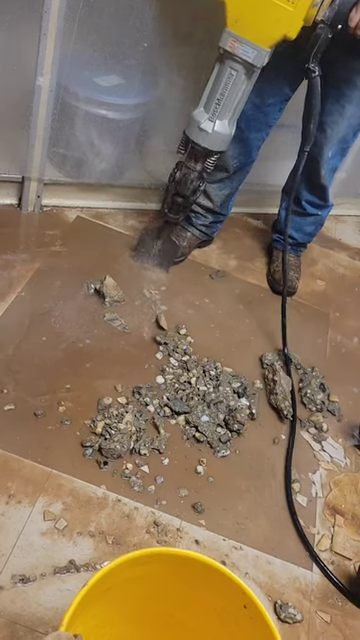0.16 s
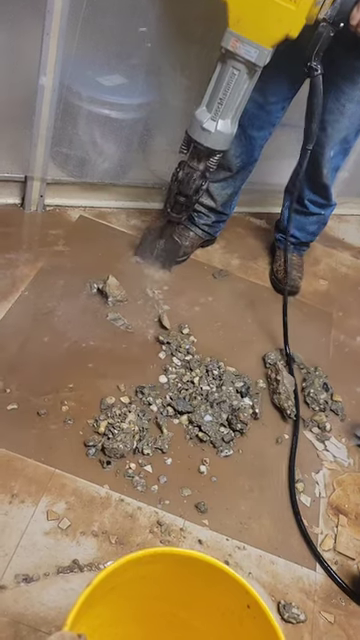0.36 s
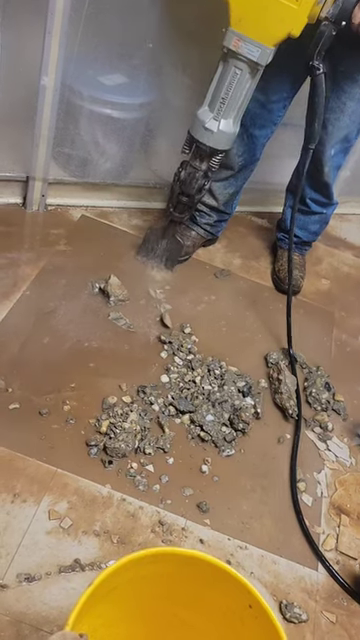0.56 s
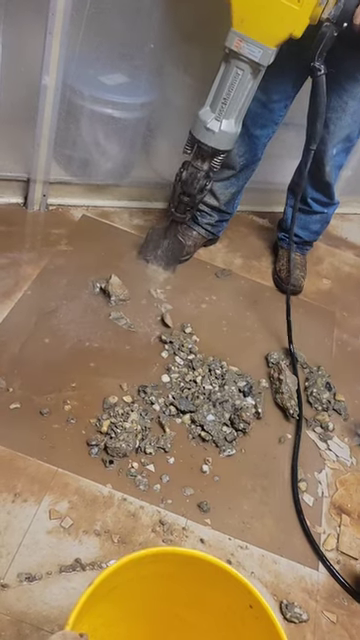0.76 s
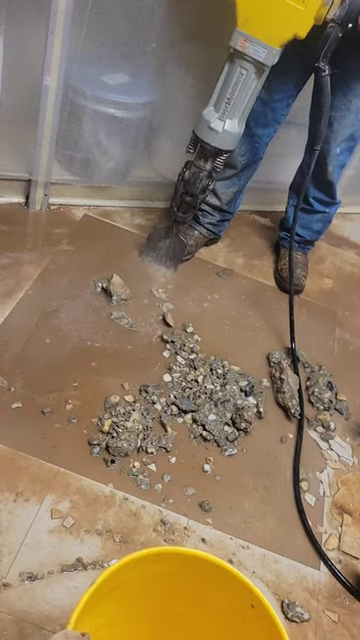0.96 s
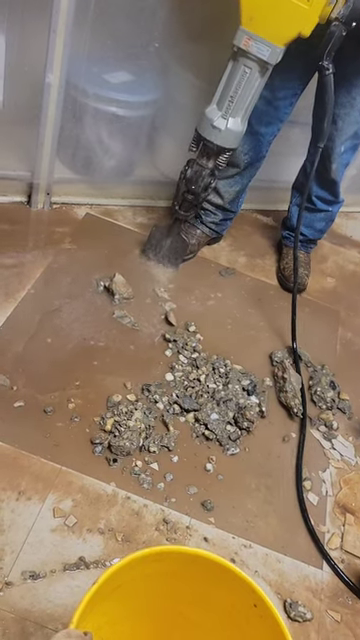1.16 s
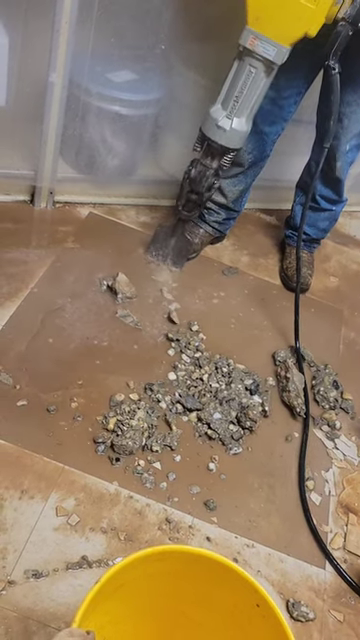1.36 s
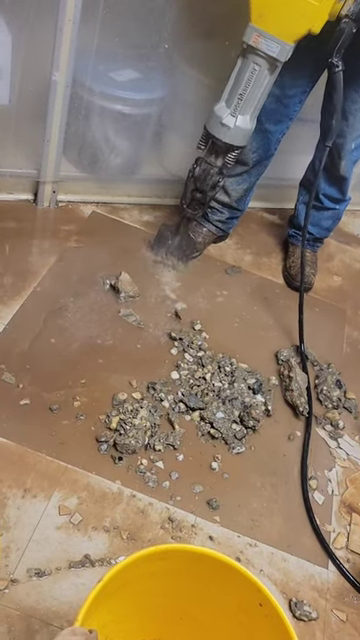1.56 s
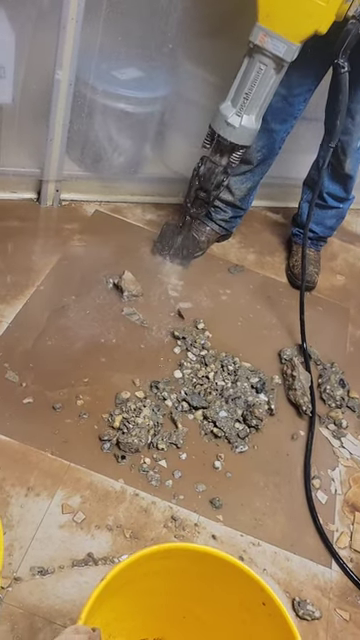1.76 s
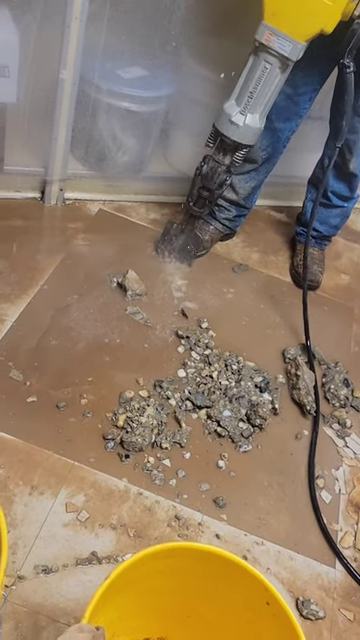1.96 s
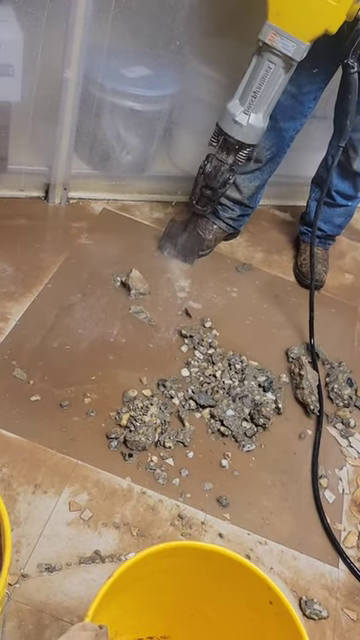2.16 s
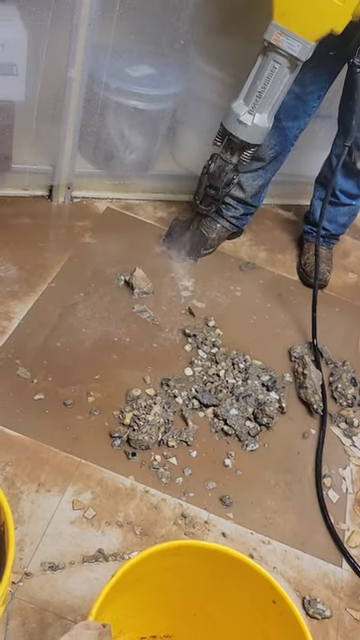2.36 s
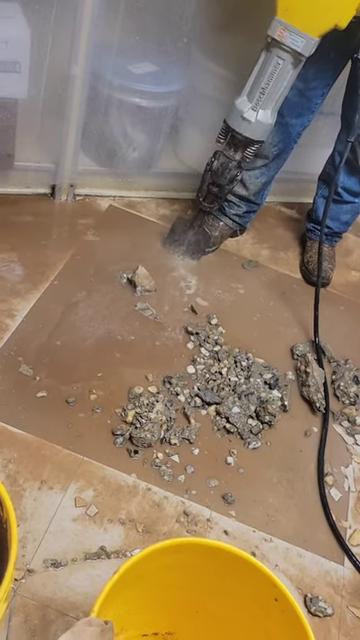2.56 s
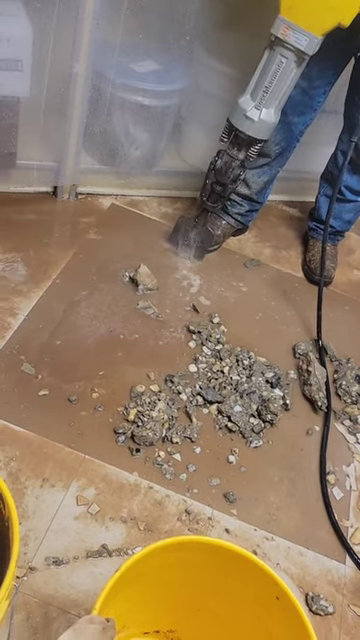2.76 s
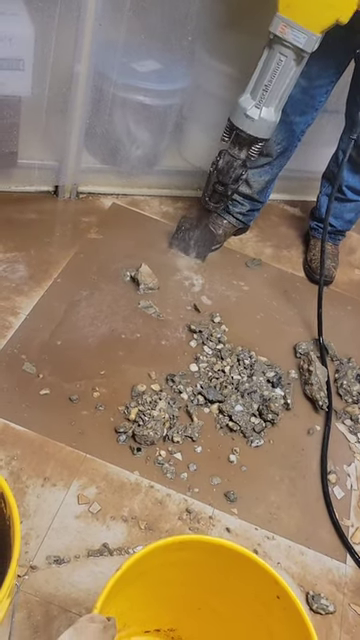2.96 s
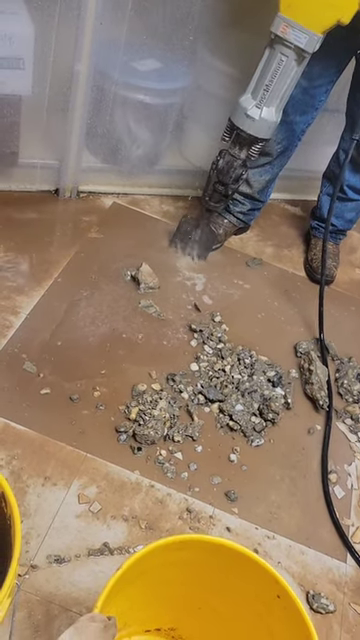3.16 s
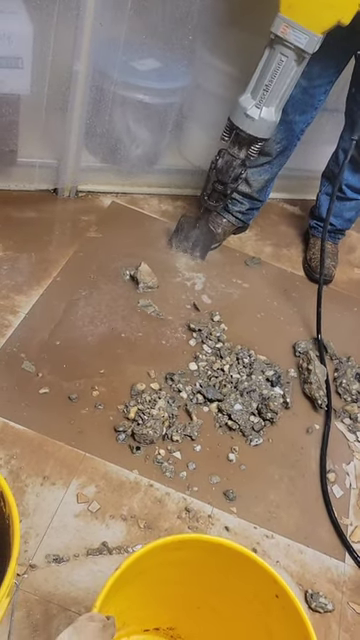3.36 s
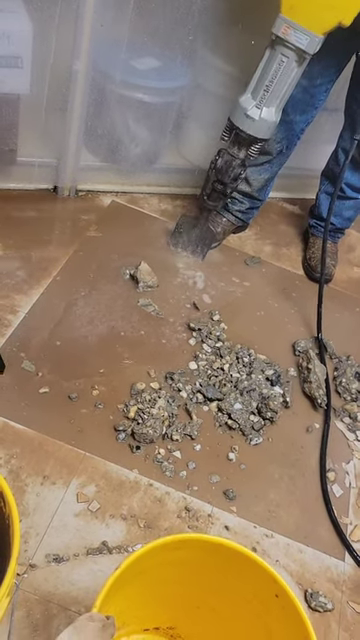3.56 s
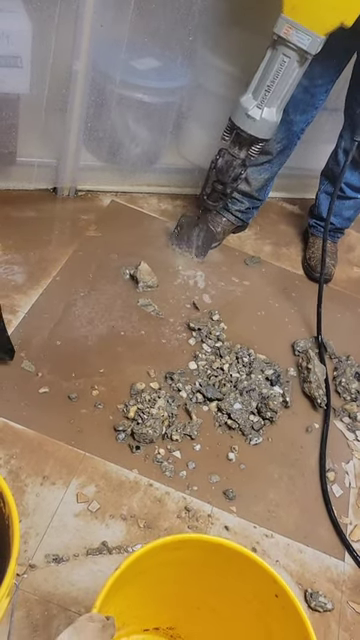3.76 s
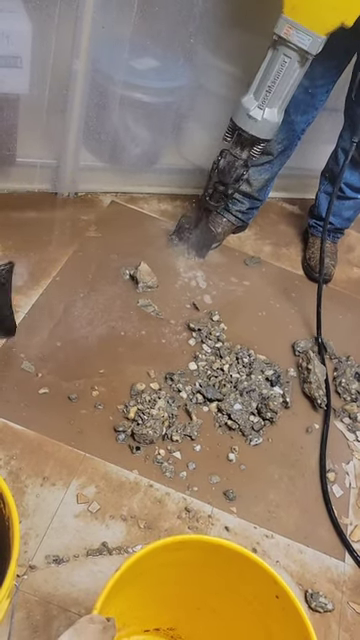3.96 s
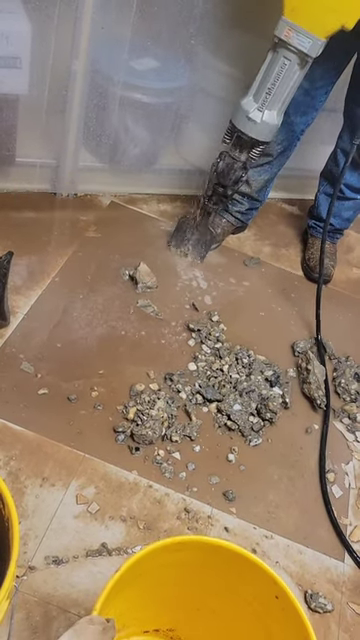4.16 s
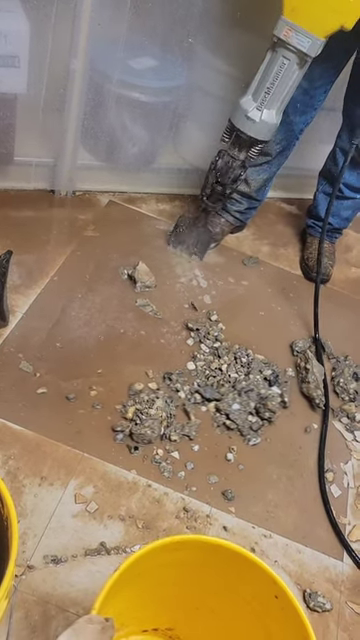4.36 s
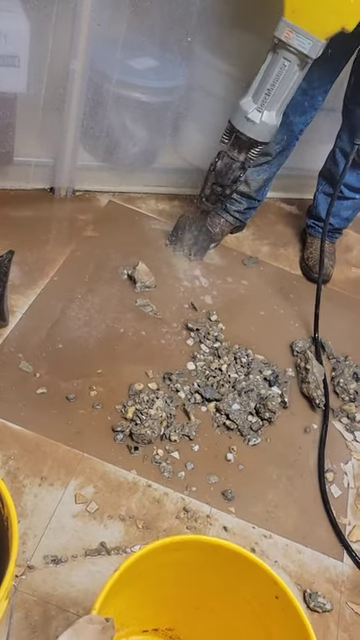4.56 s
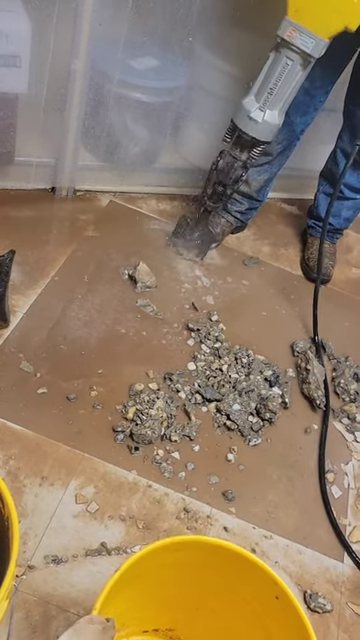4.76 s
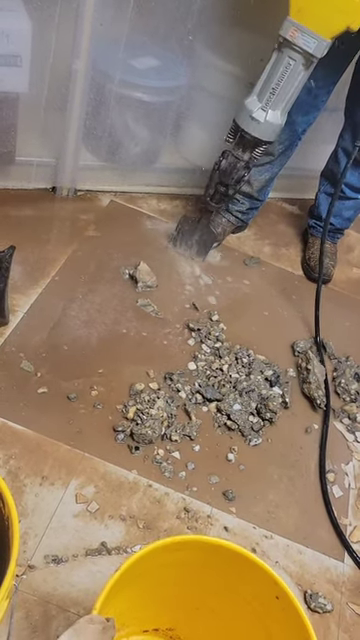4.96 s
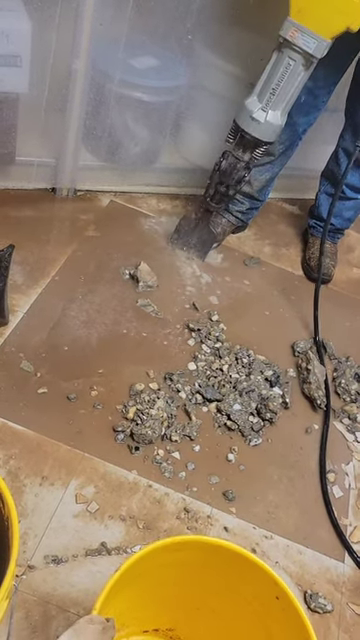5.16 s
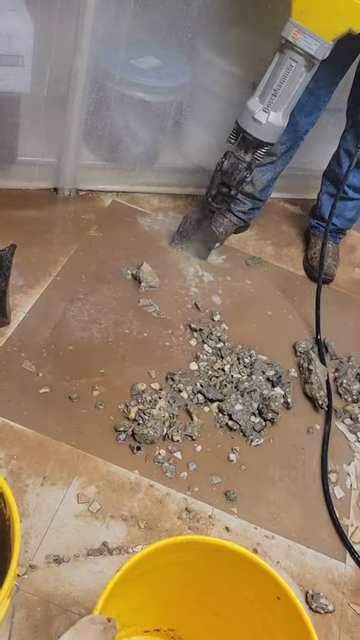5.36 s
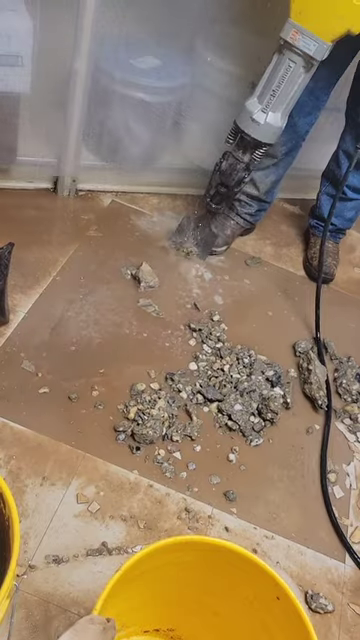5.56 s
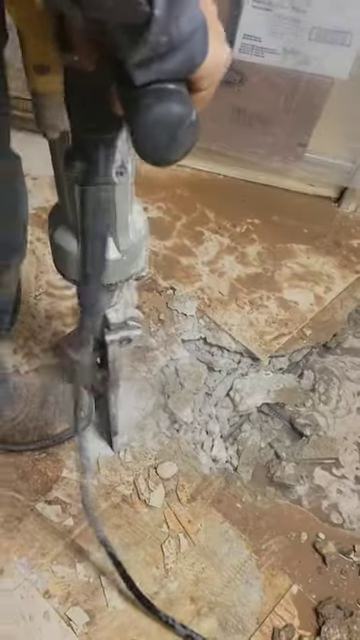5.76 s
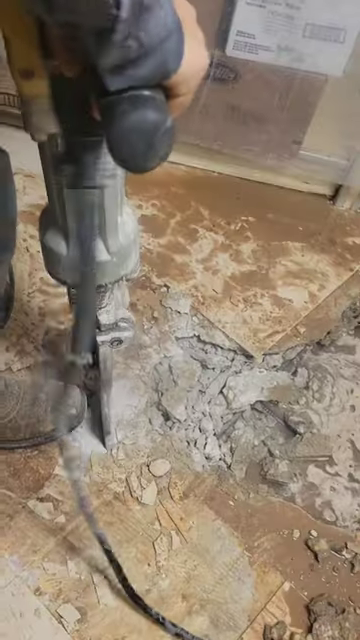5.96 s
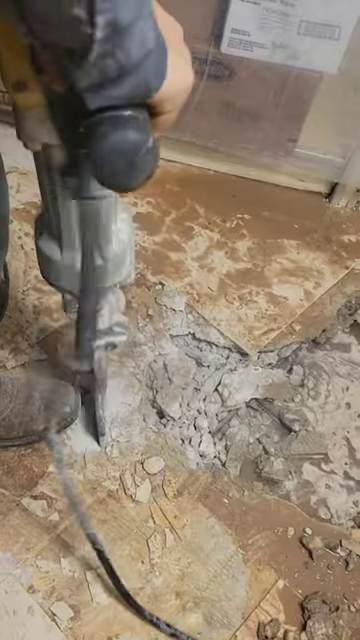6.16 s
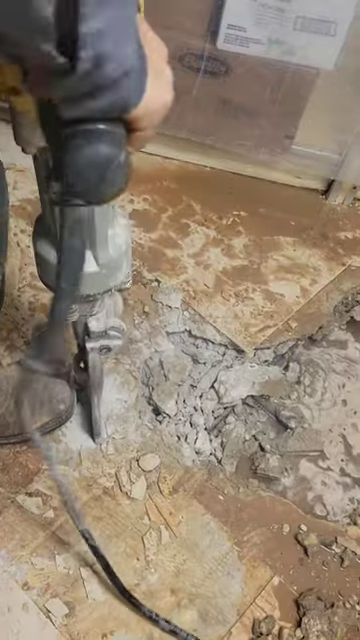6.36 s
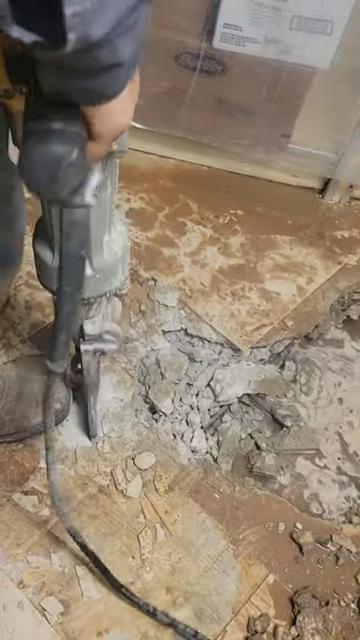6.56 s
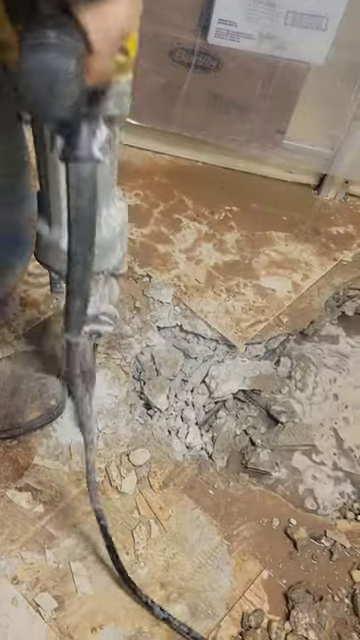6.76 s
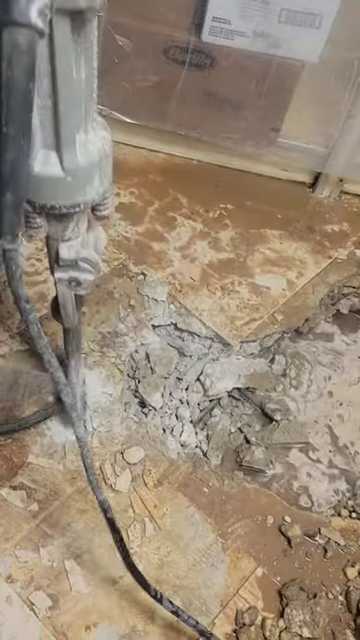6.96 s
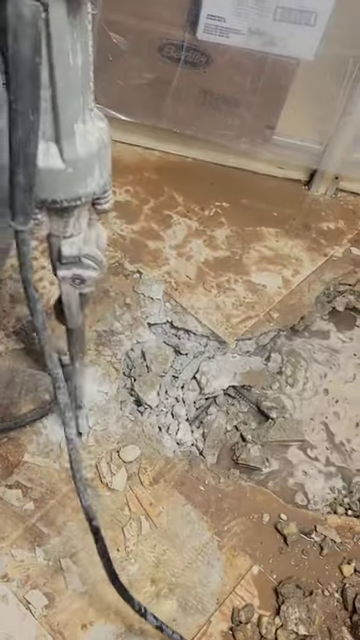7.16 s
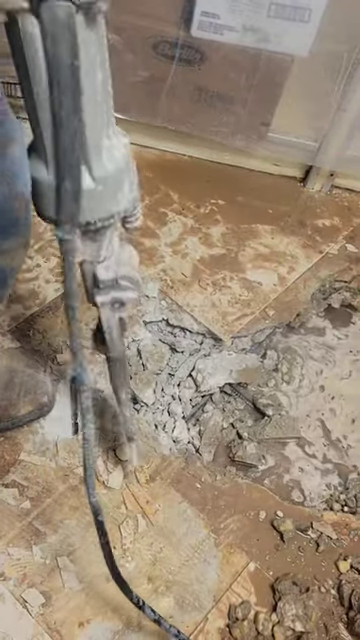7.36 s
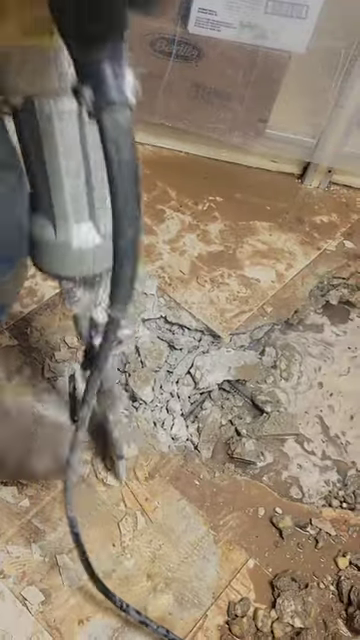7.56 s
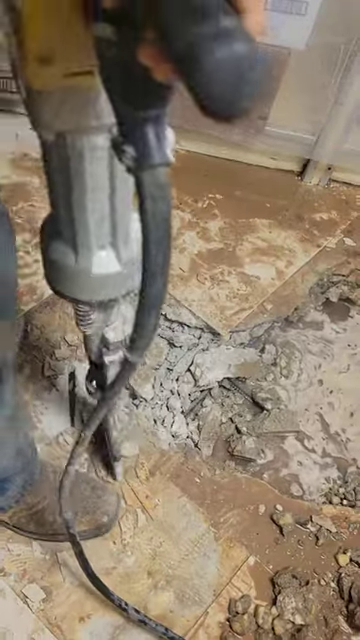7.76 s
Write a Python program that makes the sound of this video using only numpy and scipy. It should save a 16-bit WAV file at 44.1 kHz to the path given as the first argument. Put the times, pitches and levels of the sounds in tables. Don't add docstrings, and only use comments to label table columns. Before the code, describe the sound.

Rapid ringing jackhammer blows on a concrete floor, a short gap, a closer burst that runs down, then a knock and gritty drag.

```python
import sys
import numpy as np
from scipy import signal
from scipy.fft import rfft, irfft, next_fast_len
from scipy.io import wavfile
from scipy.ndimage import uniform_filter1d

SR = 44100
rng = np.random.default_rng(int(sys.argv[2]) if len(sys.argv) > 2 else 0)


def persist_wave(psi):
    counts = np.round(np.clip(psi, -1, 1) * 32767).astype(np.int16)
    wavfile.write(sys.argv[1], SR, np.atleast_2d(counts).T)


def linear_from_db(decibels):
    return 10 ** (np.asarray(decibels, float) / 20)


N = 345303
T = np.arange(N) / SR
CUT_S = 5.78

STEEL_HZ = [1500, 2150, 2370, 2870, 3140, 3690, 4150, 4725, 4822, 5495, 5700, 5970, 6500, 6990, 7170, 7975,
            9430, 10250, 10420, 11480, 11700, 11880, 12550, 13040, 14535, 15500]
# level in dB in each of the four stages, free t60 in s.
SHAFT = [(-12, -32, -12, -30, 0.39), (-14.5, -27, -38, -25, 0.12), (-28, -10, -19, -23, 0.1),
         (-9, -17, -13, -11, 0.31), (-7.5, -10, -5.5, -10, 0.33), (-18, -16, -20, -25, .2),
         (-11.5, -21, -29, -2, 0.4), (-9, -18, -10.5, -11, 0.92), (-5.5, -9, -23, -25, 1),
         (-7.5, 7.5, -7.5, -1, 0.62), (-13.5, -10, -24, -18, 0.64), (-5, -12, -15, -3, 0.38),
         (-27.5, 4, -7, -22, 0.07)]
# level in dB in each of the four stages, free t60 in s.
BARREL = [(-28, -17, -16, -18, 0.32), (-9.5, -14, -6, -1.5, 0.41), (-8.5, -5, 1, -17, 0.23),
          (-9.5, -10, -19, -7, 0.24), (-18, -25, -29, -25, 0.49), (-29, -27.5, -35, -7.5, 2.8),
          (-4.5, 1.5, -22, -11, 0.95), (-10.5, -10, -31, -7, 0.25), (-8, -6, -17, -14, 0.51),
          (-19, -1, -7, -18, 0.23), (-20.5, -21, -28, -15, 0.47), (0, 2, 0, 5, 0.24),
          (-26, -19, -26, -5, 4.0)]
# start in s, damping in dB per s, crushing held in ms,
# fall in dB in 10 ms, crack in dB.
STAGES = [
    (0, 72, 38.2, 5, 1),
    (5.78, 133, 19, 2.5, 7.5),
    (6.4, 118, 15.6, 9.5, 12),
    (6.9, 64, 48, 13, -2),
]


def rms_one(x):
    return x / np.sqrt(np.mean(x ** 2) + 1e-20)


def in_time(rows):
    s, *columns = np.transpose(rows)
    return [np.interp(T, s, c) for c in columns]


def drift(rate):
    r = np.exp(-2 * np.pi * rate / SR)
    return rms_one(signal.lfilter([1], [1, -2 * r, r * r], rng.standard_normal(N)))


def filtered(x, *curves):
    size = next_fast_len(N)
    log_hz = np.log(np.arange(size // 2 + 1) * SR / size + 1)
    gains = []
    for curve in curves:
        hz, db = np.transpose(curve)
        gains.append(linear_from_db(np.interp(log_hz, np.log(hz), db)))
    return irfft(rfft(x, size) * gains, size)[:, :N]


def noise(spectrum):
    # frequency in Hz, side minus mid in dB.
    width = [(60, -3), (110, -13.5), (200, -24), (380, 1), (700, 3.5), (1290, 4.5), (2380, -0.5), (4400, 1),
             (8120, 1.5), (15000, -0.5)]
    coloured = filtered(rng.standard_normal((2, N)), spectrum, spectrum)
    mid, side = filtered(coloured, [(1, 0)], width)
    return rms_one(np.array([mid + side, mid - side]))


def band_pass(x, low_hz, high_hz):
    return signal.sosfilt(signal.butter(2, [low_hz, high_hz], "band", fs=SR, output="sos"), x)


def band(x, low_hz, high_hz):
    return rms_one(band_pass(x, low_hz, min(high_hz, 20000)))


def ring(clicks, hz, t60):
    r, w = linear_from_db(-60 / (t60 * SR)), 2 * np.pi * hz / SR
    return signal.lfilter([0, np.sin(w)], [1, -2 * r * np.cos(w), r * r], clicks + 1e-18)


def train(seconds, sizes):
    clicks = np.zeros(np.shape(sizes)[:-1] + (N,))
    clicks[..., np.round(np.asarray(seconds) * SR).astype(int)] = sizes
    return clicks


def since_blow(s):
    last = np.clip(np.searchsorted(s, T) - 1, 0, None)
    return last, np.maximum(T - s[last], 0)


def after_blow(s, level_db, rise_ms, hold_ms, fall_db):
    last, age = since_blow(s)
    ms, hold = 1000 * age, hold_ms[last]
    fall = fall_db[last] * hold / 30 * np.logaddexp(0, 3 * (ms / hold - 1))
    room = linear_from_db(-16.5 - 80 * age)
    return linear_from_db(level_db[last]) * (linear_from_db(-fall) + room) * (1 - np.exp(-ms / rise_ms))


def far_blows():
    counted = [0, 1, 10, 20, 26, 35, 50, 67, 73, 77]
    lands_s = [0.2091, .2730, 0.9095, 1.6158, 2.0423, 2.675, 3.7376, 4.9447, 5.3672, 5.6532]
    # time in s, push in dB,
    # rebound in dB (every second blow bites, the one between skids).
    lean = [(.2, 4, 2.5), (.33, 2.5, 0.5), (.45, 2, -0.5), (.8, -0.5, .5), (1.2, 1, 0.5), (1.9, 0, 2),
            (2.2, -1, 0), (2.6, 0.5, 1.5), (3.1, 0.5, 0), (3.7, 0.5, 0), (4.3, 0, -1.5), (5.0, 0.5, .3),
            (5.5, 0, 1.8), (5.66, -2, -3)]
    level_db, scatter_db = [-18.5, -21, -20, -25], [1.2, 1.43, 1.96, 1.03]
    push_share, rebound_share = [0.88, 0.72, 1.1, 0.14], [1.36, 0.48, 0.78, 0.17]
    jitter_ms = 0.596
    k = np.arange(counted[-1] + 1)
    luck = rng.standard_normal((len(k), 5))
    s = np.interp(k, counted, lands_s) + jitter_ms / 1000 * luck[:, 0].clip(-2, 2)
    at, push, rebound = np.transpose(lean)
    push = np.interp(s, at, push)
    rebound = np.interp(s, at, rebound) * (-1) ** k
    leaning = np.outer(push, push_share) + np.outer(rebound, rebound_share)
    return np.c_[s, level_db + leaning + scatter_db * luck[:, 1:]]


def chisel(s, ring_db, top_db, stage):
    last, age = since_blow(s)
    damping = np.array(STAGES)[stage, 1]
    shake = np.array([drift(64) for k in range(4)]) * np.sqrt(damping[last] / 100)
    out = np.zeros((2, N))
    for k, (hz, (*levels_db, t60)) in enumerate(zip(STEEL_HZ, SHAFT + BARREL)):
        luck = rng.standard_normal((len(s), 6)).T
        seat = signal.lfilter([1], [1, -.6], luck[0])
        level_db = (top_db if hz > 6600 else ring_db) + np.array(levels_db)[stage] + 1.0
        level_db = level_db + np.sqrt(damping / 100) * (2.13 * seat + 2.25 * luck[1:3])
        pitch = hz + (5 + .0011 * hz) * luck[3]
        phase = 2 * np.pi * (pitch[last] * age + luck[4:, last]) + 0.83 * shake[k % 4]
        swell = 1 - np.exp(-age * (1500.0 if 4000 < hz < 6600 else 300.0))
        fall = 60 / t60 + damping[last] * (.45 if t60 > 2 else 1)
        out += linear_from_db(level_db[:, last] - fall * age + 3.8 * shake[k % 3 + 1]) * swell * np.sin(phase)
    return out


def crushing(s, ring_db, top_db, crush_db, thud_db, stage):
    # frequency in Hz, level in dB.
    far_colour = [(35, -41), (60, 4), (156, -16), (336, 9), (547, -12), (1500, -10), (2320, -16),
                  (3130, -16.5), (3700, -20.5), (4870, -14.5), (6300, -15.5), (8520, -28), (11000, -24),
                  (11700, -16.5), (15600, -20.5)]
    # frequency in Hz, level in dB.
    near_colour = [(35, -46), (60, -16), (226, -5), (476, -22), (690, -17), (2110, -20.5), (3600, -20.5),
                   (5110, -19.5), (5480, -9.5), (8520, -36.5), (10800, -32.5), (11500, -23), (15600, -31.5)]
    stone = np.where(T < CUT_S, noise(far_colour), noise(near_colour)) * linear_from_db(1.5 * drift(480))
    hold_ms, fall_db, crack_db = np.array(STAGES)[stage, 2:].T
    last, age = since_blow(s)
    out = band(stone, 50, 468) * after_blow(s, thud_db - 3, 1.8, 0.93 * hold_ms, 0.35 * fall_db)
    crunch = after_blow(s, crush_db - 4.0, 0.63, hold_ms, fall_db)
    bright = after_blow(s, ring_db - 1.5, 0.72, 0.69 * hold_ms, 0.73 * fall_db)
    spray = after_blow(s, top_db - 1.5, 4.0, hold_ms, 0.78 * fall_db)
    for low_hz, high_hz, envelope in [(533, 2640, crunch), (2650, 6950, bright), (7030, 16820, spray)]:
        edges = np.geomspace(low_hz, high_hz, 6)
        patches = 0
        for k, pair in enumerate(zip(edges, edges[1:])):
            luck = linear_from_db(1.53 * rng.standard_normal(len(s)))[last]
            patches = patches + (-1) ** k * luck * band_pass(stone, *pair)
        out = rms_one(patches) * envelope - out
    crack = band(stone, 750, 17000) * linear_from_db((ring_db + crack_db)[last] - 16000 * age)
    return out + crack


def thud(blows, booms, echoes, boom_db, knock_db, clutter_db):
    s, thud_db = np.transpose(blows)[[0, 4]]
    out = np.zeros((2, N))
    for hz, db, t60, ms in booms:
        out -= ring(train(s + ms / 1000, linear_from_db(thud_db + db + boom_db)), hz, t60)
    paths = 0
    for ms, left, right in echoes:
        level_db = thud_db + np.array([[left], [right]]) + 1.4 * rng.standard_normal(len(s))
        paths = paths + train(s + ms / 1000, linear_from_db(level_db))
    knock = signal.lfilter([.2], [1, -.8], ring(paths, 522, 0.0036))
    age = np.arange(SR // 8) / SR
    clutter = noise([(200, -39), (500, 9), (750, 1), (1500, -3.5), (3000, -28)])[:, :len(age)]
    clutter = clutter * linear_from_db(-300 * age) * (1 - np.exp(-age / 0.005))
    clutter = signal.fftconvolve(train(s, linear_from_db(thud_db))[None], clutter, axes=1)[:, :N]
    return out - linear_from_db(knock_db) * knock + linear_from_db(clutter_db) * clutter


def hammer():
    # frequency in Hz, level in dB, t60 in s, arrival in ms.
    far_booms = [(71.8, -12, 0.44, 2.9), (98.4, -11, 0.25, 2.96), (153.7, -3.5, 0.34, 1.94),
                 (183.4, -8.5, 0.34, 4.9), (220, -6, 0.091, 2.03), (316, 1, 0.13, 26),
                 (355.4, -1, 0.16, 29.1), (403.3, -1, 0.082, 7.46), (588, -23.5, 0.15, 9.34),
                 (702.6, -6.5, 0.18, 13), (1015, -14.5, 0.34, 8.5)]
    # frequency in Hz, level in dB, t60 in s, arrival in ms.
    near_booms = [(125, -3, 0.14, 1.6), (153, -13, 0.29, 2), (193.7, -3, 0.17, 2.2),
                  (231.4, 1.5, 0.18, 1.6), (293.5, -1.5, 0.19, 2.46)]
    # arrival in ms, left in dB, right in dB.
    far_echoes = [(-0.96, -17.5, 8.5), (9, 15, -64.5), (13, 6.5, -99), (16, -53.5, -5.5), (20, -1, 11.5),
                  (15.5, -32, 10), (26.5, 15, -14), (45.5, -20.5, -36.5), (36.0, 0, 6), (52, -27, -19.5),
                  (45.5, -5, 12), (50, -24, -5.5)]
    # arrival in ms, left in dB, right in dB.
    near_echoes = [(0.483, -4, 5), (7.96, -3, -0.5), (21.47, -24, 2), (29.75, -10, -1)]
    parts = []
    for blows in (far_blows(), near_blows()):
        earlier = np.subtract(blows[0], [0.079, 0.022, 0, 0.019, 0.0087])
        parts.append([earlier, *blows])
    far, near = parts
    s, ring_db, top_db, crush_db, thud_db = np.transpose(far + near)
    stage = np.searchsorted(np.array(STAGES)[:, 0], s) - 1
    far_thuds = thud(far, far_booms, far_echoes, 3.2, 8.65, 7)
    near_thuds = thud(near, near_booms, near_echoes, 1.6, 10.5, -5)
    out = chisel(s, ring_db, top_db, stage) + crushing(s, ring_db, top_db, crush_db, thud_db, stage)
    return out + np.where(T < CUT_S, far_thuds, near_thuds) + squeak(s, stage)


def run_down():
    # time in s, air level in dB, gear whine level in dB.
    strokes = [
        (7.046, -44, -37),
        (7.125, -33.5, -55),
        (7.2, -34, -46),
        (7.31, -33, -45),
        (7.44, -37, -49),
    ]
    load_air_db, idle_air_db, release_s, spin_down_db_per_s = -32.5, -39.5, 6.97, 118
    whine_rise_s, whine_fall_db_per_s = .03, 258
    t = T[:, None]
    s, air_db, whine_db = np.transpose(strokes)
    width = 0.25 * np.gradient(s)
    steady = np.maximum(load_air_db - spin_down_db_per_s * np.maximum(T - release_s, 0), idle_air_db)
    puffs = linear_from_db(air_db) * np.exp(-.5 * ((t - s) / width) ** 2)
    whine = linear_from_db(whine_db - whine_fall_db_per_s * np.maximum(t - s, 0))
    whine = whine * np.clip(1 + (t - s) / whine_rise_s, 0, 1) ** 2
    return np.maximum(linear_from_db(steady), puffs.max(axis=1)), whine.max(axis=1)


def motor():
    # frequency in Hz, level in dB.
    air_colour = [(47, -37.5), (87, 3), (300, -6), (520, -11.5), (850, -15.5), (2080, -12.5), (3320, -13.5),
                  (5900, -14.5), (6500, -24.5), (10700, -34.5), (16000, -33)]
    hum_hz, hum_db = 59.2, -39.5
    air, brush = run_down()
    whine = rms_one(ring(rng.standard_normal((2, N)), 2372, 0.061))
    gears = 0
    for hz, db in [(3370, -13.5), (5280, -17.0)]:
        gears = gears + linear_from_db(db) * rms_one(ring(rng.standard_normal((2, N)), hz, 0.042))
    hum = np.sqrt(2) * linear_from_db(hum_db) * np.sin(2 * np.pi * hum_hz * T)
    hum = hum * linear_from_db(2.0 * drift(6)) * (T > CUT_S)
    return air * linear_from_db(2.7 * drift(8.2)) * (noise(air_colour) + gears) + brush * linear_from_db(7.0) * whine + hum


def near_blows():
    # time in s, bite in dB, thud in dB.
    blows = [(5.8813, 2, -0.5), (5.9512, 2, 1), (6.0199, -2, -0.5), (6.0897, -2, -0.5), (6.1573, -1.5, 0),
             (6.2274, -3.5, 0.5), (6.295, 1, 3), (6.3609, -4.5, 1.5), (6.4315, 6, 2), (6.5011, 6.5, 3),
             (6.5702, 8.5, 2.5), (6.6366, 3, 0), (6.7155, 4, -0.5), (6.8055, 1.5, -2), (6.9252, -1.5, -15)]
    level_db = [-16.5, -18.5, -18, -16]
    s, bite, thud_db = np.transpose(blows)
    return np.c_[s, level_db + np.c_[bite, 1.2 * bite, 1.1 * bite, thud_db]]


def squeak(s, stage):
    last, age = since_blow(s)
    age = age - .054
    level_db = np.array([-58, -27, -40, -45])[stage] + 2.0 * rng.standard_normal(len(s))
    phase = 2 * np.pi * (3620 * age - 14000 * age ** 2) + .5 * drift(150)
    return linear_from_db(level_db[last]) * np.exp(-(age / 0.011) ** 2) * np.sin(phase)


def drag():
    # time in s, grit level in dB, rumble level in dB.
    strength = [
        (7.612, -28.5, -25.5),
        (7.658, -20, -26.5),
        (7.69, -13, -18.5),
        (7.718, -17, -21),
        (7.802, -39, -41.5),
        (7.83, -59, -33),
    ]
    # frequency in Hz, density in dB per Hz.
    grit_colour = [(530, -46), (900, -12), (979, 4), (1220, 8.5), (1510, 4), (4200, 8.5), (7230, 4.5),
                   (8450, -9), (11800, -6), (16000, -6)]
    # frequency in Hz, density in dB per Hz.
    rumble_colour = [(29, -70), (50, -26), (119, 13), (296, 8), (538, -0.5), (837, 1.5), (993, -15),
                     (1500, -25), (1950, -41), (3300, -120)]
    set_down_s, set_down_db = 7.6100, -12.5
    grit_db, rumble_db = in_time(strength)
    touching = T > set_down_s
    grains = (rng.random(N) < 900 / SR) * linear_from_db(1.7 * rng.exponential(1, N).clip(0, 4))
    grit = noise(grit_colour) * (1 + 0.89 * signal.lfilter([1], [1, -.985], grains))
    modes = zip(STEEL_HZ, SHAFT + BARREL)
    steel = rms_one(sum(linear_from_db(mode[0]) * ring(grit, hz, 0.1) for hz, mode in modes))
    landing = train([set_down_s], linear_from_db([set_down_db]))
    slab = np.roll(landing, int(0.00258 * SR))
    knock = ring(slab, 130, .04) * linear_from_db(-5.0) + ring(slab, 410, 0.013) * linear_from_db(-4.5)
    tick = ring(landing, 5200, 0.0024) * linear_from_db(-0.5) + ring(landing, 1700, 0.0035) * linear_from_db(-10.0)
    scrape = linear_from_db(grit_db) * (0.66 * rms_one(grit) + 0.5 * steel)
    rumble = linear_from_db(rumble_db + 2.0 * drift(60)) * noise(rumble_colour)
    return touching * (scrape + rumble) + knock + tick


def scene():
    return hammer() + motor() + drag()


def gain_control(x, knee_db, squeeze, window_ms):
    power = uniform_filter1d(np.mean(x ** 2, axis=0), int(window_ms * SR / 1000))
    level_db = 10 * np.log10(power.clip(1e-12))
    return x * linear_from_db(-np.clip(squeeze, 0, .9) * np.maximum(level_db - knee_db, 0))


def editing():
    # start of the fade in s, gain in dB.
    parts = [
        (0.1807, 3),
        (5.8525, -2),
    ]
    fade_in_s, fade_from_db, edge_db_per_s = 0.026, -33.5, 8000
    chop_s, tail_db, tail_s, tail_db_per_s = 5.678, -23.5, 0.015, 1500
    start, gain_db = np.array(parts)[(T > CUT_S).astype(int)].T
    age = T - start
    over = np.where(T > CUT_S, 0, T - chop_s)
    fade_db = fade_from_db * np.clip(1 - age / fade_in_s, 0, 1) + edge_db_per_s * np.minimum(age, 0)
    fall_db = tail_db - tail_db_per_s * over - edge_db_per_s * np.maximum(over - tail_s, 0)
    chop_db = np.where(over > 0, fall_db, 0)
    return linear_from_db(gain_db + fade_db + chop_db)


def low_pass(x):
    return signal.sosfilt(signal.butter(12, 16820, fs=SR, output="sos"), x)


def record(dry):
    # frequency in Hz, left minus right in dB.
    ports = [(60, 1.5), (110, -1), (200, 1), (380, 0), (700, -0.5), (1290, -3.5), (2380, 2.5), (4400, -4.5),
             (8120, 2.5), (15000, 0.5)]
    x = filtered(dry, np.multiply(ports, [1, .5]), np.multiply(ports, [1, -.5]))
    x = gain_control(x * linear_from_db(2.0), knee_db=-17.5, squeeze=0.33, window_ms=6.1)
    x = 0.86 * np.tanh(x / 0.97)
    x = signal.sosfilt(signal.butter(2, 45, "high", fs=SR, output="sos"), x)
    x = signal.sosfilt(signal.ellip(10, .5, 60, 15700, fs=SR, output="sos"), x)
    return low_pass(x * editing())


dry = scene()
out = record(dry)
persist_wave(out)
```